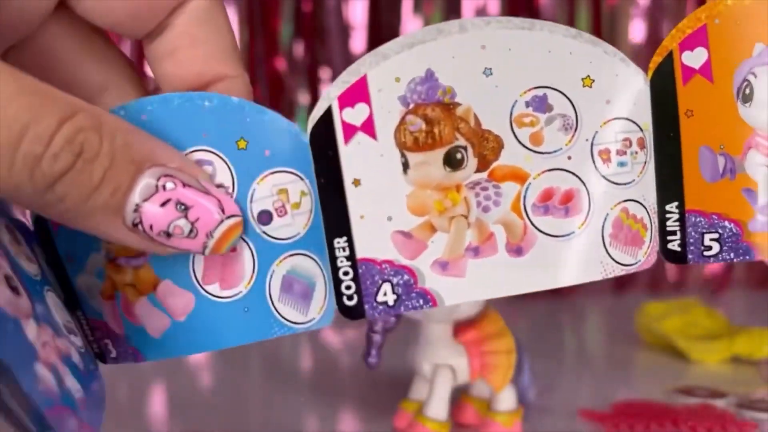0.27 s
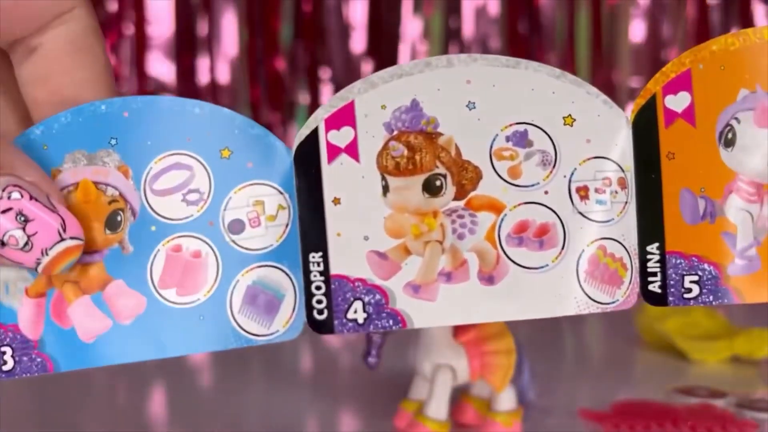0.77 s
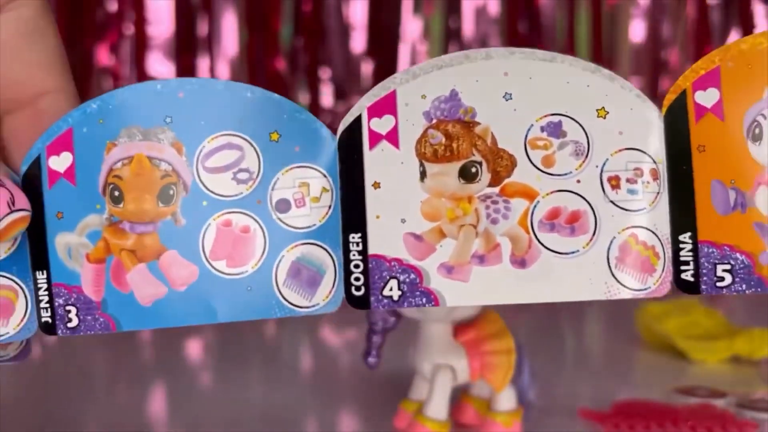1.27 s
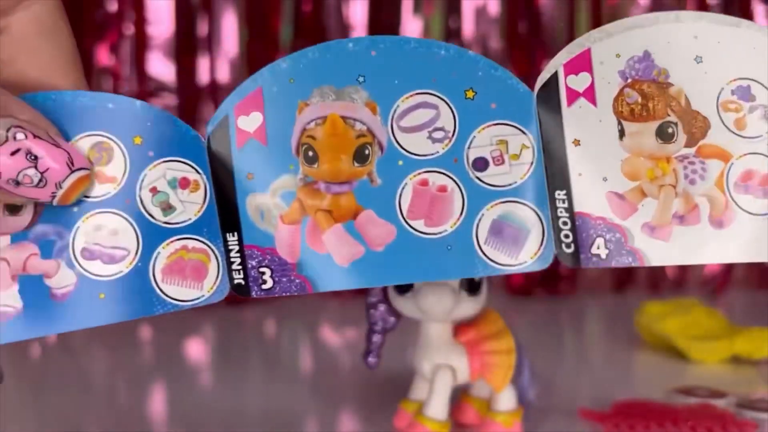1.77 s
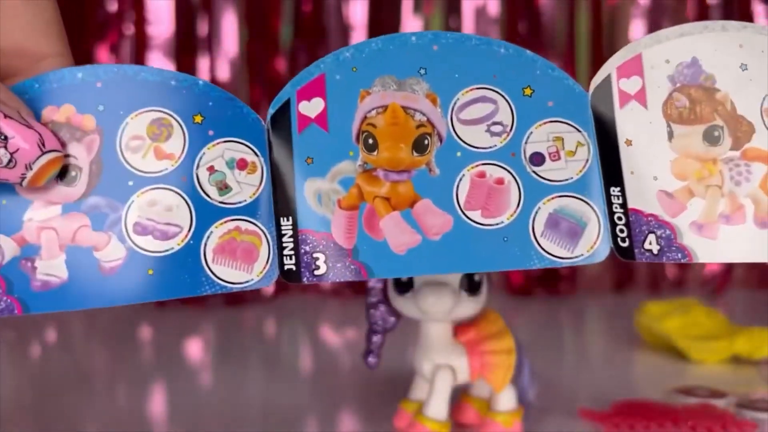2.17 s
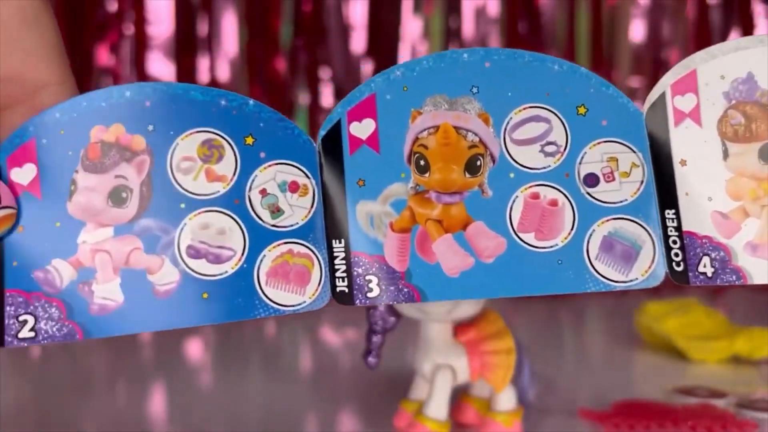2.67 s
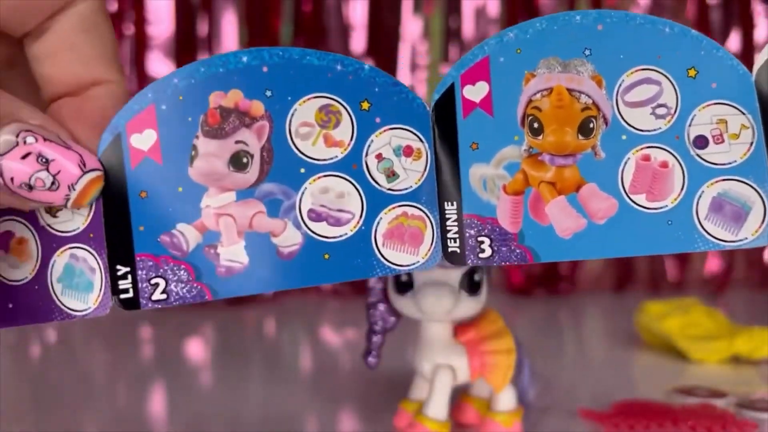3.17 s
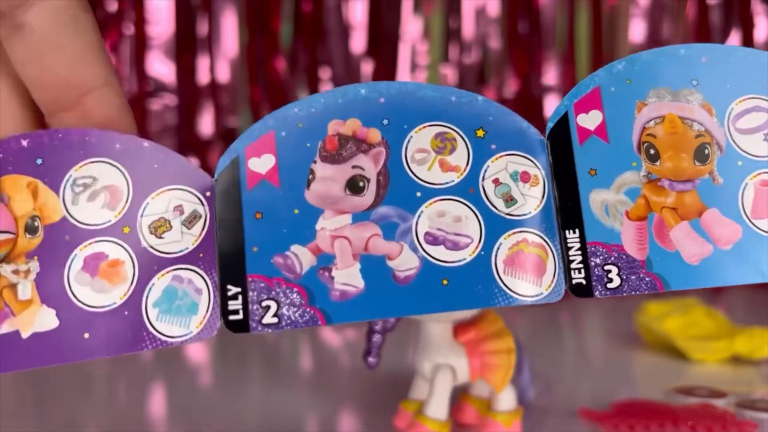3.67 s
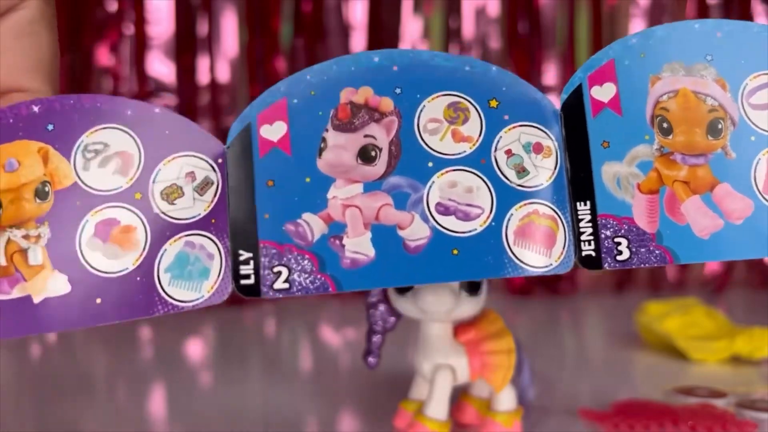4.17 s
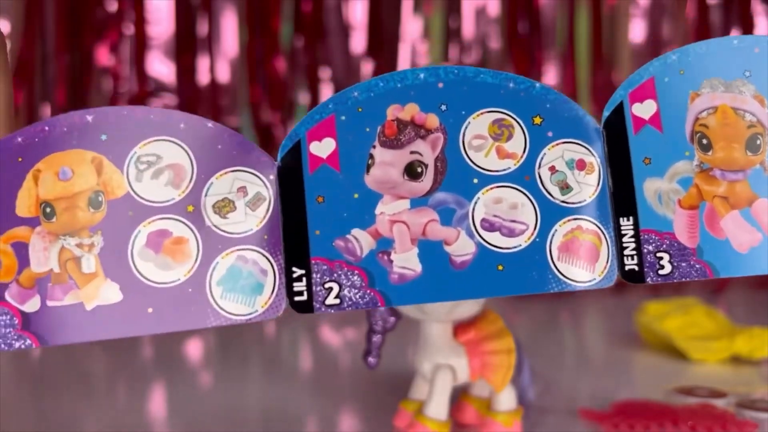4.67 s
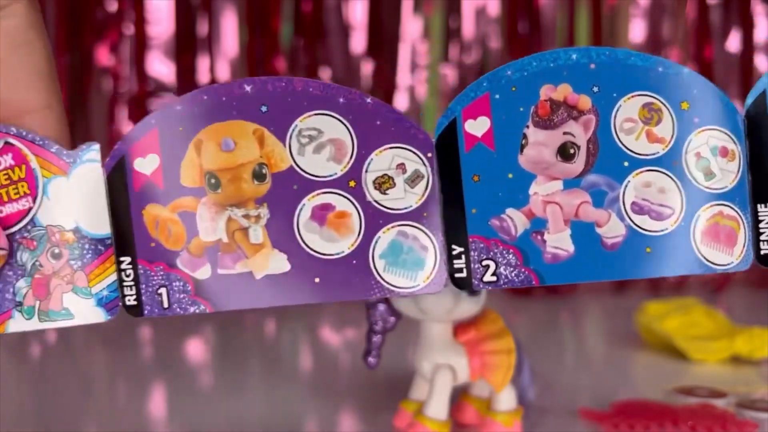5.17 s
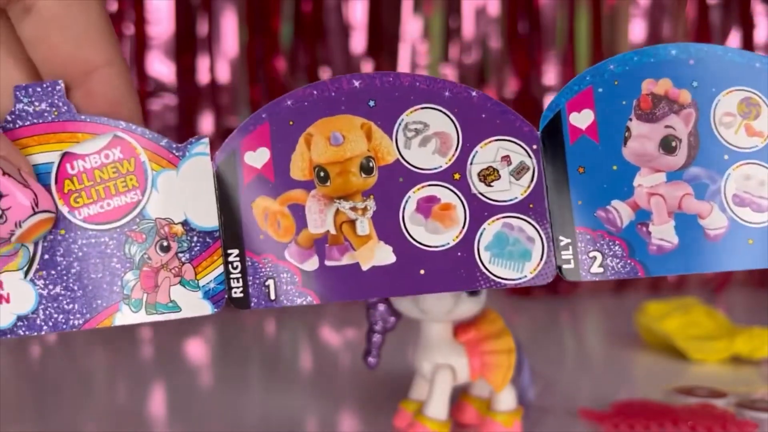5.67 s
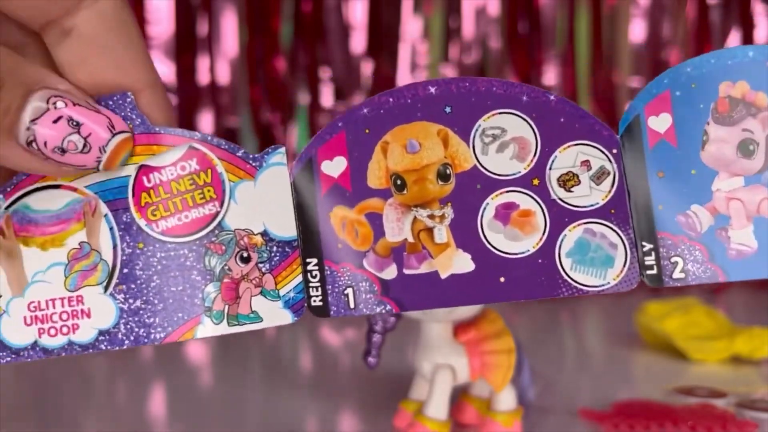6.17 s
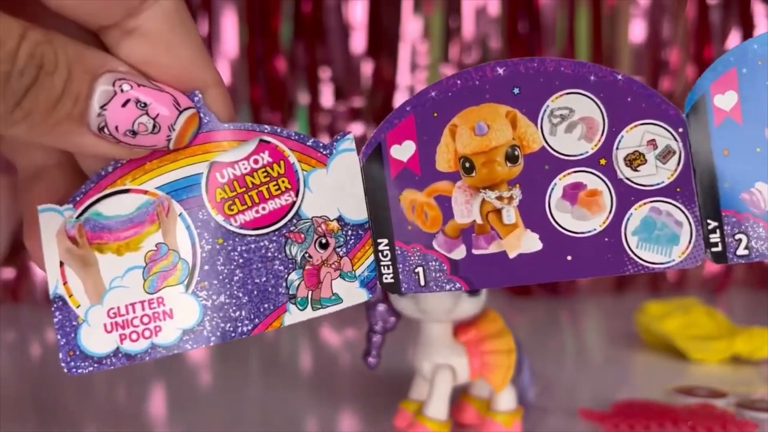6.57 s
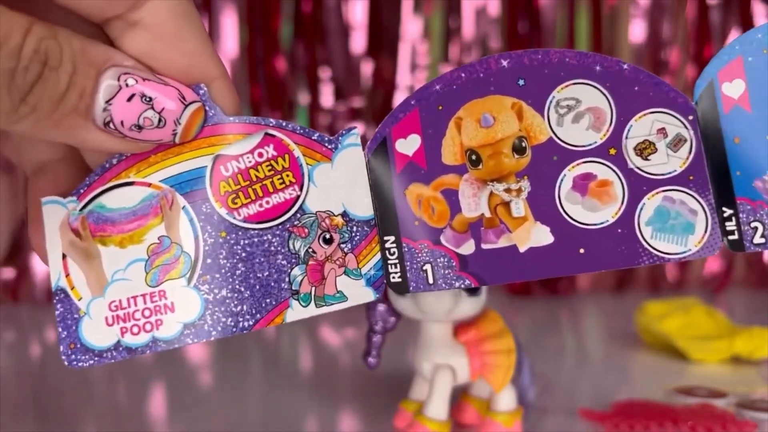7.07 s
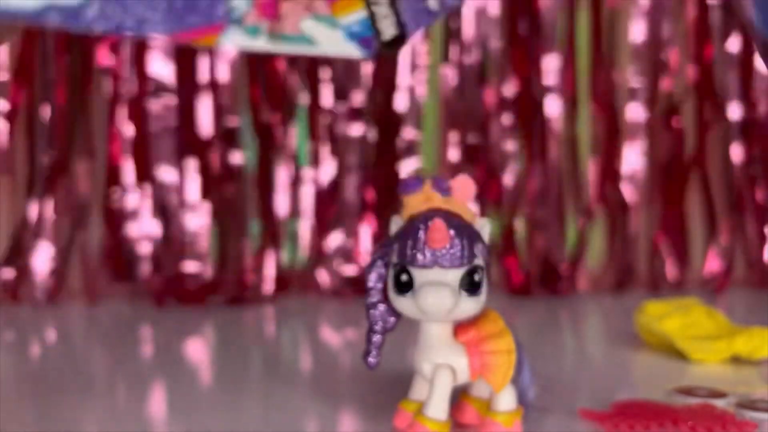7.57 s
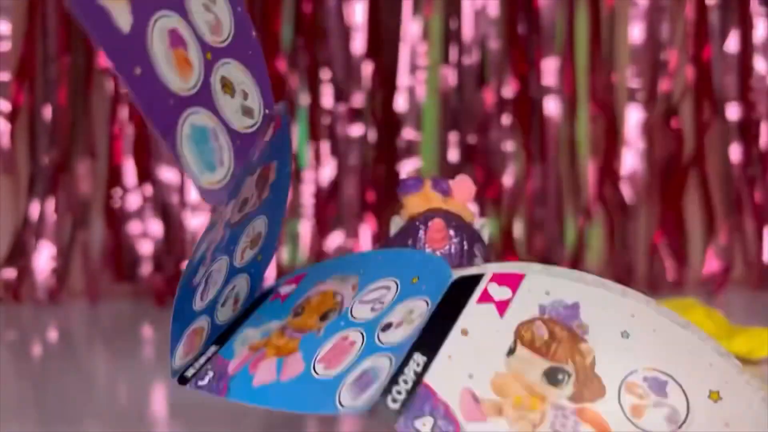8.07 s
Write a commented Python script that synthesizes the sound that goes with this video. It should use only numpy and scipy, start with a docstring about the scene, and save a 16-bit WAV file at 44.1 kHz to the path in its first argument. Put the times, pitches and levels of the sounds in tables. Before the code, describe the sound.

Stiff glossy paper panels rasp, flex and tick under handling, busy at first, then faint, with scattered snaps over a low hum.

```python
"""A card hisses and judders under the fingertips, and an early snap breaks in: a glossy fold-out leaflet
is being pushed along by hand in a small quiet room. Its panels rasp and flex, creases tick and folds snap.
Sliding is made of tiny random slips, juddering and creeping of nearly regular ones, and ticks and snaps
of short noise bursts; all of these pass through the resonances of the card.
Mains hum, low rumble and faint room air lie underneath, with one soft low drone."""
import sys
import numpy as np
from scipy import signal
from scipy.fft import rfft, irfft
from scipy.io import wavfile
from scipy.ndimage import uniform_filter1d

SR = 44100
rng = np.random.default_rng(int(sys.argv[2]) if len(sys.argv) > 2 else 0)


def store_wav(level_fs):
    """Save 16-bit WAV to argv[1]."""
    pcm = np.round(np.clip(np.atleast_2d(level_fs), -1, 1) * 32767)
    wavfile.write(sys.argv[1], SR, pcm.T.astype(np.int16))


N = 366907
TIME = np.arange(N) / SR  # seconds

# Still air of the room: (frequency [Hz], relative level per Hz [dB])
AIR_SPECTRUM = [(35, -43), (55, -11), (90, -13), (150, -15.5), (250, -35), (760, -43), (9000, -62.5),
                (15000, -92)]
# Mains hum: (frequency [Hz], rms level [dB])
HUM_TONES = [(58.6, -53), (118, -72.5)]
# One faint low drone: (start [s], length [s], frequency [Hz], rms level [dB])
LOW_DRONE = 6.1, .44, 95.5, -56.5
# How long the room rings: (frequency [Hz], time to fall by 60 dB [s])
ROOM_RING = [(150, 0.26), (600, 0.13), (2500, 0.11), (7000, 0.83), (14000, 0.16)]
# What the card radiates, before its resonances: (frequency [Hz], relative level [dB])
CARD_SPECTRUM = [(70, 5), (420, -1), (750, -10), (1200, -18), (1800, -14), (5300, -27), (7800, -24.5),
                 (9000, -28), (13000, -27), (15800, -30)]
# Resonances of the stiff panels, before any stiffening: (frequency [Hz], width [Hz], peak [dB])
PANEL_MODES = [(224.4, 12, 5), (875, 160, 10), (1420, 200, 6), (2018, 240, 10.5), (2597, 220, 6.5),
               (4200, 650, 3.5)]
# The card is held towards the left: (frequency [Hz], left minus right [dB])
LEFT_LEAN = [(150, 2.5), (1800, 4), (7600, 8.5), (11000, 0.5)]
# A fold snaps or an edge is knocked: (time [s], crisp edge [dB], panel ring [dB], thud [dB],
# rise [s], basic decay [s], left minus right [dB], stiffness [factor on the card's resonances])
SNAPS = [(0.0448, -44.5, -38, -60, 0.00029, 0.0012, 0.5, 1),
         (1.293, -67, -34.5, -37, 0.00006, 0.0021, -4.5, 0.944),
         (2.9124, -19.5, -26, -30.5, 0.0028, 0.003, 0.5, 0.99),
         (3.572, -35, -31.5, -38, 0.0013, 0.0019, 2.5, 1.036),
         (4.15, -41, -41.5, -41, 0.00062, 0.0023, 1, 1.37),
         (6.574, -43.5, -48, -58, 0.0002, 0.0035, 3, 1.05),
         (7.489, -59, -41.5, -51.5, 0.0032, 0.0042, 1, 0.994),
         (7.99, -31.5, -23, -31, 0.0038, 0.005, -2.5, 1.28),
         (8.21, -46, -62, -72, 0.0053, 0.0027, -1, 1.34)]
# Single ticks of creases and nails: (time [s], crisp edge [dB], panel ring [dB], thud [dB])
TICKS = [(0.243, -54.5, -54, -45.5), (0.368, -67, -59, -42.5), (0.396, -68, -50.5, -46),
         (0.457, -57, -57, -54.5), (0.503, -55, -50, -48), (0.582, -58, -51, -43),
         (0.685, -54, -46.5, -41.5), (0.911, -63, -44.5, -40.5), (1.011, -52.5, -42, -36.5),
         (1.129, -77, -52.5, -43), (1.349, -53, -44.5, -37), (1.58, -56, -63, -43.5),
         (1.848, -49, -55.5, -49.5), (2.215, -59, -67, -60), (2.416, -57, -56, -52.5),
         (2.644, -55.5, -42.5, -43), (2.783, -48.5, -52.5, -52), (3.115, -63, -53.5, -45.5),
         (3.678, -66, -63, -41), (3.977, -56, -54, -47), (4.0, -51.5, -47.5, -43.5),
         (4.251, -51, -52, -54.5), (4.478, -61, -64, -57), (4.799, -60, -51, -58),
         (4.832, -61.5, -51.5, -51), (4.883, -56.5, -46, -55), (5.895, -55.5, -56.5, -53.5),
         (7.327, -59.5, -61, -58), (7.636, -85, -54.5, -48.5), (7.866, -74, -59.5, -49),
         (8.019, -68, -53, -35.5), (8.06, -65, -47, -44), (8.083, -66, -46, -49)]
# The card creeps through a tight grip in small slips: (start [s], length [s], slip rate [1/s],
# typical crisp edge [dB], typical panel ring [dB], typical thud [dB], stiffness [factor])
CREEPS = [(0.713, .065, 76.5, -54.5, -48.5, -38.5, 1.03), (0.822, .075, 58, -56.5, -49, -42, 1.13),
          (4.576, .07, 54, -69, -67, -66.5, 1.08), (4.976, .125, 61.3, -60.5, -54, -46, 0.9),
          (5.127, .12, 33.6, -57.5, -60, -45, 0.9), (5.381, .14, 29.6, -61.5, -64, -56.5, 1.1),
          (5.565, .17, 28.4, -62, -64, -55, 1.02), (5.756, .13, 37, -62, -55, -61, 1.013),
          (5.964, .11, 30, -65, -63.5, -70, 1.04), (6.108, .26, 39.7, -65, -65, -61, 1.13),
          (6.461, .065, 42, -62.5, -61, -64, 1.02)]
# A fingertip sticks and slips on the gloss: (start [s], end [s], first slip rate [1/s],
# last slip rate [1/s], share of the friction [0-1])
JUDDERS = [(0.045, 0.25, 135, 68, 0.7), (1.61, 1.785, 120, 104, 0.82), (1.88, 2.03, 54, 73, 0.55)]
# The fingers push the card on in strokes, some of them overlapping: (start [s], length [s],
# sliding hiss [dB], panel rasp [dB], flexing rumble [dB])
STROKES = [(0.0, 0.24, -54, -50, -41.5), (0.248, 0.16, -56.5, -57.5, -51), (0.513, 0.048, -54, -53, -39),
           (0.71, 0.19, -63.5, -53, -45), (0.899, 0.134, -56.5, -56, -64), (1.097, 0.47, -58.5, -57.5, -55),
           (1.322, 0.14, -57.5, -55.5, -42.5), (1.602, 0.16, -51.5, -53, -42), (1.858, 0.16, -53, -55, -45),
           (2.209, 0.074, -59, -63.5, -54.5), (2.416, 0.07, -61.5, -64.5, -60.5),
           (2.569, 0.15, -60.5, -61, -59.5), (2.838, 0.1, -53, -52, -45.5), (2.95, 0.2, -65.5, -60, -58.5),
           (3.162, 0.099, -53.5, -55.5, -56.5), (3.377, 0.096, -55, -64.5, -62),
           (3.592, 0.1, -54.5, -55.5, -46.5), (3.72, 0.19, -62, -64.5, -58),
           (4.073, 0.13, -53.5, -58, -56.5), (4.254, 0.16, -57, -66.5, -61),
           (4.476, .28, -74.5, -76.5, -68), (4.78, 0.076, -66, -63.5, -58),
           (4.991, 0.23, -68, -55.5, -49.5), (5.893, 0.046, -61.5, -64, -67),
           (5.319, 1.03, -75, -70.5, -64), (7.113, 0.11, -79, -71, -64), (7.205, 0.1, -62.5, -64, -62),
           (7.343, 0.11, -65, -70, -70.5), (7.517, 0.3, -65, -70, -73.5), (7.868, 0.29, -62.5, -63, -61.5),
           (8.001, 0.12, -58.5, -52.5, -51.5), (8.169, 0.042, -55.5, -54.5, -48.5),
           (8.237, 0.12, -64.5, -69, -58.5)]

AIR_DB = -77.5  # rms of the air above 200 Hz, both channels averaged
THUD_HZ = 80, 760  # register of the whole sheet when it is pushed
ONSET_S = .005  # soft noise ahead of each burst's cascade
# Each stroke takes hold quickly, loses a little force, and dies away when the finger stops.
ATTACK_S, SAG_DB_PER_S, RELEASE_S = 0.012, 9, 0.02
RESTING_DB = -92  # the card is never quite still
SLIP_SPREAD_DB = 2.5  # how much the slips of a creep differ in level
SLIP_JITTER = .12  # unevenness of their timing, as a share of the gap between slips
RIGHT_LAG_S = .00023  # the sound reaches the left microphone first
STEREO_WIDTH = .74  # how unlike the two microphones hear each slip, 0-1
EDGE_HZ = 15900  # upper limit of the recorder


def amp(db):
    """Turns decibels into gain."""
    return 10 ** (np.asarray(db) / 20)


def evened(x):
    """Scales a signal to rms 1."""
    return x / np.sqrt(np.mean(x ** 2) + 1e-20)


def read(points, hz):
    """Reads a table between its points, along a logarithmic frequency axis."""
    f, value = np.transpose(points)
    return np.interp(np.log(hz + 1), np.log(f), value)


def add(mix, s, sound):
    """Mixes a sound in at time s, on every channel."""
    part = mix[:, max(round(s * SR), 0):][:, :sound.shape[1]]
    part += sound[:, :part.shape[1]]


def drift(hz):
    """Makes a smooth random motion of rms 1, mostly slower than hz."""
    f = np.fft.rfftfreq(N, 1 / SR)
    noise = rfft(rng.standard_normal(N))
    return evened(irfft(noise / (1 + (f / hz) ** 4), N))


def through(x, taps):
    """Passes each channel through its own filter."""
    return signal.oaconvolve(x, taps, axes=1)[:, :x.shape[1]]


def narrowed(x, width):
    """Keeps what both channels share, scales their difference by width, and sets rms 1."""
    middle = x.mean(0)
    return evened(middle + width * (x - middle))


def room_air():
    """Shaped noise, alike in both channels at low pitch and separate at high pitch."""
    hz = np.fft.rfftfreq(N, 1 / SR)
    left, other = rfft(rng.standard_normal((2, N)))
    same = 1 / (1 + (hz / 350) ** 2)
    right = same * left + np.sqrt(1 - same ** 2) * other
    air = np.array([left, right]) * amp(read(AIR_SPECTRUM, hz))
    heard = irfft(air.mean(0) * (hz > 200), N).std()
    return amp(AIR_DB) * irfft(air, N) / heard


def mains_hum(waver_db=-0.5, wander_hz=0.91, rumble_db=-65):
    """Tones that waver together in pitch and level, in a narrow bed of low noise."""
    hz = np.fft.rfftfreq(N, 1 / SR)
    wander = wander_hz * drift(2.2) / HUM_TONES[0][0]  # share of the pitch; wander_hz is for the lowest tone
    hum = np.zeros(N)
    for f, db in HUM_TONES:
        turns = np.cumsum(f * (1 + wander)) / SR
        hum += amp(db) * evened(np.sin(2 * np.pi * turns))
    low = rfft(rng.standard_normal(N))
    rumble = evened(irfft(low / (1 + ((hz - 62) / 18) ** 2) ** 2, N))
    return hum * amp(waver_db * drift(10)) + amp(rumble_db) * rumble


def drone():
    """A pure low tone swells and fades."""
    out = np.zeros((2, N))
    start, length, hz, db = LOW_DRONE
    t = np.arange(0, length, 1 / SR)
    tone = np.sin(2 * np.pi * hz * t) * signal.windows.tukey(len(t))
    add(out, start, amp(db) * evened(tone)[None])
    return out


def room(x, early_db, tail_db, early_s):
    """Near walls answer within milliseconds; a thin tail follows, each band dying at its own speed."""
    t = np.arange(int(.6 * SR)) / SR
    echoes = rng.standard_normal((2, len(t))) * (rng.random((2, len(t))) < .12) * (t > .005)
    hz, when, z = signal.stft(echoes, SR, nperseg=256)
    fading = amp(-60 * when / read(ROOM_RING, hz)[:, None])
    tail = signal.istft(z * fading, SR, nperseg=256)[1][:, :len(t)]
    early = rng.standard_normal(echoes.shape) * (rng.random(echoes.shape) < .03)
    early = early * (t > .004) * np.exp(-t / early_s)
    taps = amp(early_db) * evened(early) + amp(tail_db) * evened(tail)
    return through(x, taps / np.sqrt(len(t)))


def card_voice(low_hz, high_hz, stiffness=1, size=2048):
    """Card filter for one register, left and right; a tight bend stiffens it and raises its resonances."""
    hz = np.fft.rfftfreq(size, 1 / SR) + 1
    db = read(CARD_SPECTRUM, hz / stiffness)
    for f, width, peak in PANEL_MODES:
        db = db + peak / (1 + (2 * (hz / stiffness - f) / width) ** 2)
    db = db - 10 * np.log10((1 + (low_hz / hz) ** 8) * (1 + (hz / high_hz) ** 8))
    db = np.maximum(db, db.max() - 80)
    db = db + np.array([[.5], [-.5]]) * read(LEFT_LEAN, hz)
    # Minimum phase: the filter answers as early as its spectrum allows.
    log_gain = np.log(amp(np.hstack([db, db[:, -2:0:-1]])))
    taps = np.fft.ifft(np.exp(np.conj(signal.hilbert(log_gain)))).real
    return taps / np.sqrt(np.sum(taps ** 2) / 2)  # mean energy 1


def reshaping(x, depth_db=2.0):
    """As the sheet curves and the grip moves, its resonances wander, heard as slow changes of colour."""
    z = signal.stft(x, SR, nperseg=512)[2]
    field = rng.standard_normal(z.shape[1:])
    for _ in range(2):
        field = uniform_filter1d(field, size=20, axis=1)  # smooth in time
    field = evened(uniform_filter1d(field, size=3, axis=0))  # smooth in frequency
    return signal.istft(z * amp(depth_db * field), SR, nperseg=512)[1][:, :N]


def burst(rise_s, decay_s, voice, soft_db=-21, size=2800):
    """Fibres buckle in a quick cascade, within a short faint noise that fades in and out."""
    t = np.arange(size) / SR - ONSET_S
    cascade = np.clip(t / rise_s, 0, 1) ** 2 * np.exp(-np.maximum(t - rise_s, 0) / decay_s)
    shape = cascade + amp(soft_db) * np.exp(-abs(t) / decay_s)
    fibres = narrowed(rng.choice([-1, 1], (2, size)), STEREO_WIDTH)
    # rms 1 when the energy is spread over 10 ms
    return evened(through(fibres * shape, voice)) * np.sqrt(.01 * SR / size)


def ticking(rows, crisp, ring, thud, decay_s):
    """Each tick has a crisp edge, a short panel ring and a slower push on the whole sheet."""
    out = np.zeros((2, N))
    rise_s = .001
    for s, crisp_db, ring_db, thud_db in rows:
        edge = amp(crisp_db) * burst(rise_s, decay_s, crisp)
        panel = amp(ring_db) * burst(rise_s, decay_s, ring)
        push = amp(thud_db) * burst(2 * rise_s, 2 * decay_s, thud)
        add(out, s - ONSET_S, edge + panel + push)
    return out


def creeping(crisp, thud, count=12):
    """Runs of nearly even slips, each of its own colour; their ring wakes only middle panel resonances."""
    out = np.zeros((2, N))
    for start, length, per_s, *levels_db, stiffness in CREEPS:
        rows = []
        for k, (late, *colour) in enumerate(rng.standard_normal((count, 4))):
            if k < length * per_s:
                s = start + (k + SLIP_JITTER * late) / per_s
                rows.append((s, *(levels_db + SLIP_SPREAD_DB * np.array(colour))))
        ring = card_voice(1400 * stiffness, 2400 * stiffness, stiffness)
        out += ticking(rows, crisp, ring, thud, decay_s=0.0048)
    return out


def snapping(flap_s=0.021, flap_db=-4):
    """A fold gives way in a few milliseconds and the sheet flaps on after it."""
    out = np.zeros((2, N))
    for s, crisp_db, ring_db, thud_db, rise_s, decay_s, pan_db, stiffness in SNAPS:
        crisp = card_voice(3300, 9800, stiffness)
        ring = card_voice(950, 3500, stiffness)
        thud = card_voice(*THUD_HZ, stiffness)
        edge = amp(crisp_db) * burst(rise_s, decay_s * 1.1, crisp)
        panel = amp(ring_db) * burst(rise_s, decay_s, ring)
        push = amp(thud_db) * burst(rise_s, decay_s, thud)
        flap = amp(thud_db + flap_db) * burst(0.0049, flap_s, thud).mean(0)
        pan = amp([[pan_db / 2], [-pan_db / 2]])
        add(out, s - ONSET_S, (edge + panel + push + flap) * pan)
    return out


def stroke_levels():
    """Levels in dB of hiss, rasp and flexing: each stroke takes hold, sags and lets go."""
    power = np.full((3, N), amp(RESTING_DB) ** 2)
    for start, length, *levels_db in STROKES:
        t = np.arange(0, length + 8 * RELEASE_S, 1 / SR)
        hold = np.minimum(t / ATTACK_S, 1) * amp(-SAG_DB_PER_S * t)
        force = hold * np.exp(-np.maximum(t - length, 0) / RELEASE_S)
        add(power, start, (amp(levels_db)[:, None] * force) ** 2)
    return 10 * np.log10(power)


def grains(per_s, spread_db, scatter_s, count=10, size=256):
    """Tiny uneven slips; each spot of the card reaches the two microphones by its own paths."""
    sizes = amp(spread_db * np.minimum(rng.exponential(1, N), 4))
    slips = (rng.random(N) < per_s / SR) * sizes * rng.choice([-1, 1], N)
    spot = rng.integers(0, count, N)
    paths = rng.standard_normal((count, 2, size)) * np.exp(-np.arange(size) / SR / scatter_s)
    out = np.zeros((2, N))
    for k in range(count):
        here = (slips * (spot == k))[None]
        out += signal.oaconvolve(here, paths[k], axes=1)[:, :N]
    return narrowed(out, STEREO_WIDTH)


def crinkles(per_s=32, spread_db=2.5, decay_s=.0045):
    """A bending crease gives in small uneven steps; each starts a short decaying envelope."""
    steps = np.floor(np.cumsum(per_s * amp(2 * drift(per_s))) / SR)
    kicks = (np.diff(steps, prepend=0) > 0) * amp(spread_db * drift(per_s))
    return evened(signal.lfilter([1], [1, -np.exp(-1 / (decay_s * SR))], kicks))


def judder(jitter, unevenness_db):
    """Nearly regular stick-slip pulses, their share of the friction, and the phase within each slip."""
    rate, share = np.full(N, 100.), np.zeros(N)
    for start, end, first, last, part in JUDDERS:
        glide = np.exp(np.interp(TIME, [start, end], np.log([first, last])))
        rate = np.where(TIME > start - .02, glide, rate)
        fade = np.clip(np.minimum(TIME - start, end - TIME) / 0.014 + .5, 0, 1)
        share += np.clip(part, 0, .98) * fade
    phase = np.cumsum(rate * (1 + jitter * drift(60))) / SR % 1
    pulses = (np.diff(phase, prepend=0) < 0) * amp(unevenness_db * drift(28))
    return evened(pulses), np.clip(share, 0, 1), phase


def dispersed(x, delay_s=.005):
    """Bending waves crawl at low pitch and race at high pitch, so each slip is drawn out."""
    hz = np.fft.rfftfreq(N, 1 / SR)
    lowest_hz = PANEL_MODES[0][0]  # delay_s holds at this pitch
    turn = np.exp(-4j * np.pi * delay_s * np.sqrt(lowest_hz * hz))
    return irfft(rfft(x) * turn, N)


def rubbing(crisp, ring, thud, groan):
    """Friction grains drive the surface, the panels and the whole bending sheet; a judder makes it groan."""
    hiss_db, rasp_db, flex_db = stroke_levels()
    pulses, share, phase = judder(jitter=.035, unevenness_db=2.2)
    catch = drift(55)  # the grip catches and lets go
    # A card that bends more than it slides breaks into crinkles, most clearly when it slides slowly.
    bending = np.clip((flex_db - hiss_db) / 8, 0, 1) * np.interp(hiss_db, [-68, -56], [.9, .55])
    free = 1 - bending + bending * crinkles() ** 2
    slip_shape = evened(np.exp(-phase / .5))
    gate = np.sqrt((1 - share) * free + share * slip_shape ** 2)
    fine = grains(per_s=7200, spread_db=4.0, scatter_s=0.0012)
    coarse = grains(per_s=1500, spread_db=2, scatter_s=0.0014)
    hiss = evened(through(fine * gate * amp(2.0 * catch), crisp))
    rasp = evened(through(coarse * gate * amp(2.9 * catch), ring))
    loose = evened(through(dispersed(coarse * amp(3.6 * catch)), thud))
    groaning = evened(through(dispersed(np.array([pulses, pulses])), groan))
    flex = np.sqrt(1 - share) * loose + np.sqrt(share) * groaning
    return hiss * amp(hiss_db) + rasp * amp(rasp_db) + flex * amp(flex_db)


def scene():
    """The handled card and its echo in the room, over the drone, the hum and the air."""
    crisp, ring, thud = card_voice(3900, 11000), card_voice(820, 3300), card_voice(*THUD_HZ)
    soft_flex = card_voice(66, 500)  # soft fingertips bend the sheet more darkly than a snap does
    groan = card_voice(89, 610)  # a juddering fingertip makes the sheet sing on its low overtones
    card = rubbing(crisp, ring, soft_flex, groan) + snapping()
    card += ticking(TICKS, crisp, ring, thud, decay_s=0.0053) + creeping(crisp, soft_flex)
    left, right = reshaping(card)
    card = np.array([left, np.roll(right, round(RIGHT_LAG_S * SR))])
    echo = room(card, early_db=-11.0, tail_db=-23.0, early_s=0.031)
    return card + echo + drone() + room_air() + mains_hum()


def record(dry):
    """The recorder cuts off the highest treble."""
    taps = signal.firwin(401, EDGE_HZ, window=("kaiser", 9), fs=SR)
    return signal.oaconvolve(dry, taps[None], "same")


dry = scene()
out = record(dry)
store_wav(out)
```